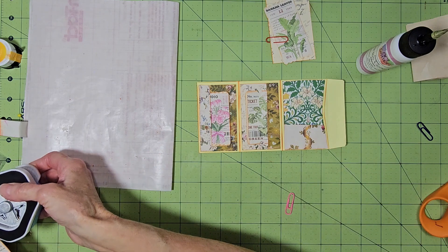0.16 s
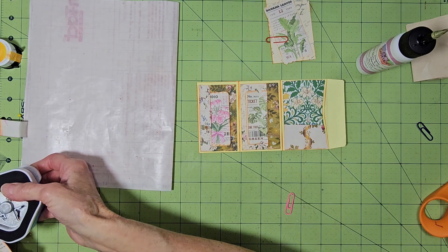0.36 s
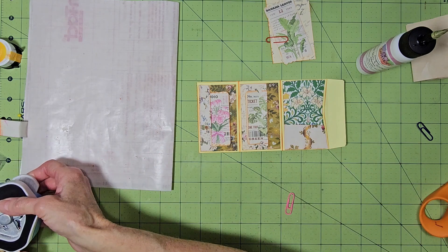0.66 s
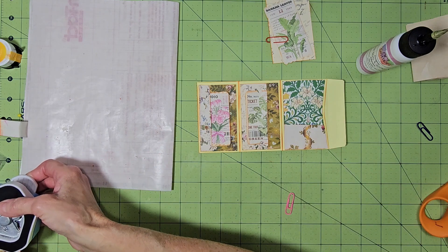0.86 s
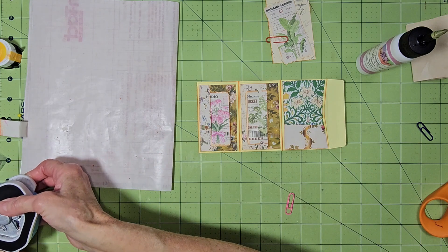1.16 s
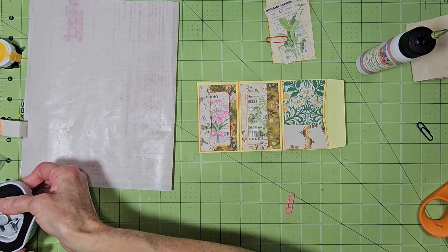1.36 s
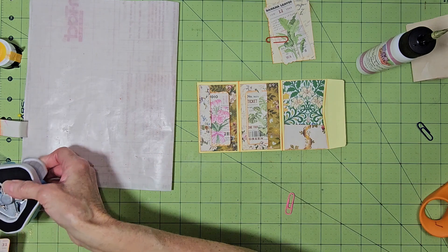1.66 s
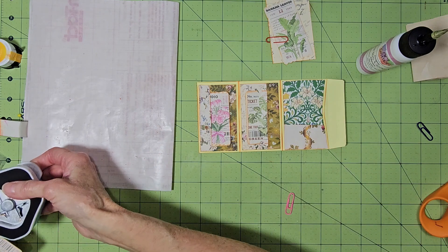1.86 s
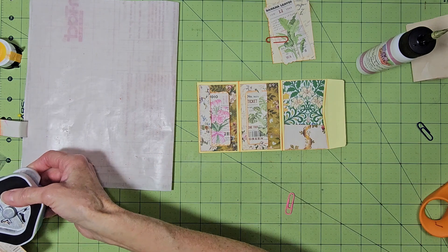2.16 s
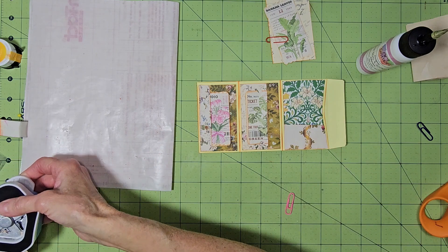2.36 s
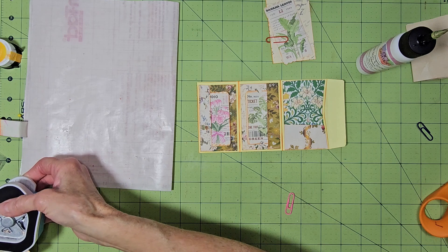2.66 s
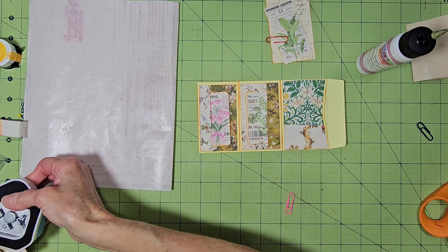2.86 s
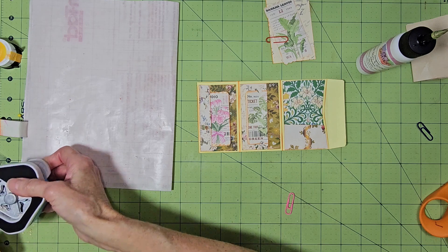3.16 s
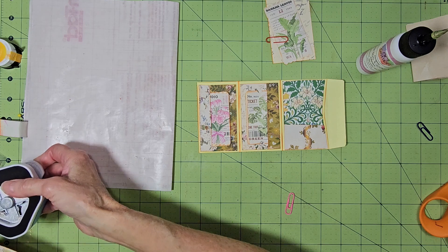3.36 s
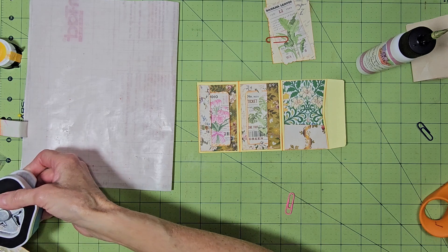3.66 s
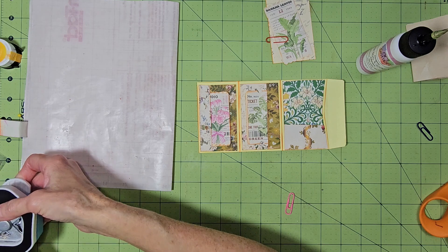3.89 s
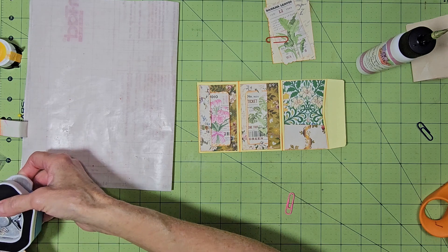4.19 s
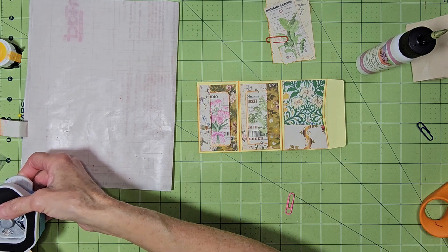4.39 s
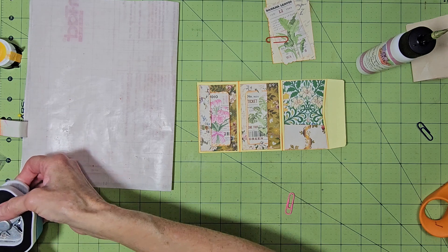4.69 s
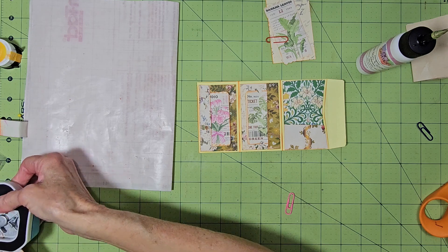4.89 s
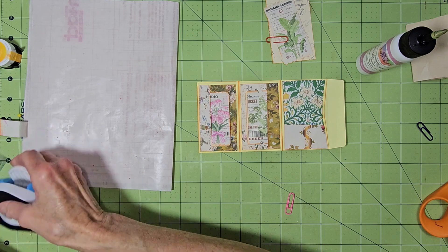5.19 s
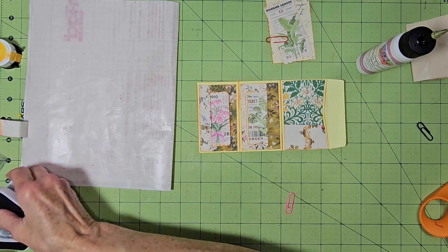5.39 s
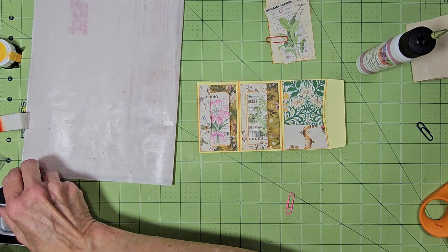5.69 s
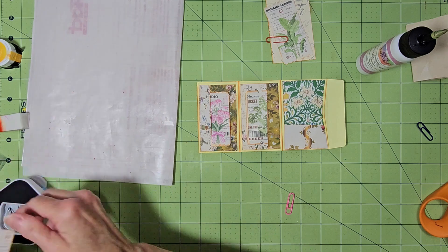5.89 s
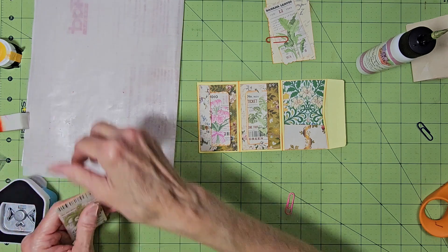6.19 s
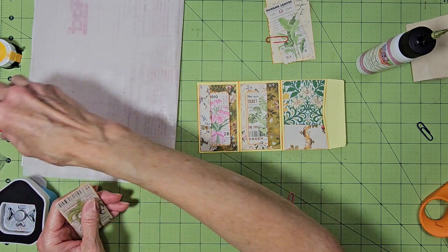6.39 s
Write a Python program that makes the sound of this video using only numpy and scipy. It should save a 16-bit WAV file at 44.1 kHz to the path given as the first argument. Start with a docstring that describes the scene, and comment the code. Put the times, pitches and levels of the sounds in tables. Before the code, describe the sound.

Card scrapes into a hand-held corner punch that bites with three sharp crunching snaps, then is set down with dull table knocks over faint fan hum.

```python
"""Card slides into a hand-held corner punch in uneven noise; its edge taps and the lever ticks, as bursts.
At about 1.3, 2.8 and 4.8 s the punch bites: torn fibres crackle louder and louder, then a burst snaps
and fading tones ring the housing. From 5.2 s three knocks set it down, a push shaking the table's tones;
taps and slides come between and after them. Throughout, a small room echoes it in stereo and a fan hums
in soft air. A low drone of filtered noise swells and dies early; a deeper rumble grows from 3.6 s, then eases."""
import sys
import numpy as np
from scipy import signal
from scipy.fft import rfft, irfft, next_fast_len
from scipy.io import wavfile
from scipy.ndimage import uniform_filter1d

SR = 44100
rng = np.random.default_rng(int(sys.argv[2]) if len(sys.argv) > 2 else 0)


def materialize(psi):
    """Save the field psi as 16-bit PCM at rate SR to the path in sys.argv[1].

    A 1-D psi becomes a single channel; in a 2-D psi each row is a channel.
    """
    bounded = np.clip(np.atleast_2d(psi).T, -1, 1)
    quanta = np.round(bounded * 32767).astype(np.int16)
    wavfile.write(sys.argv[1], SR, quanta)


N = 288414  # length of the scene in samples
T = np.arange(SR // 2) / SR  # clock for one short sound, half a second
FIRM_DB = -57  # level of a firm touch, from which brightness is counted

# The blade breaking through the card; levels after the first are relative to it:
# (time [s], level [dB], tearing [dB], tearing time [s], long ring [dB], die [dB], shell [dB],
#  shell pitch [Hz], bass [dB], treble [dB])
BLADE_SNAPS = [(1.3445, -27, -10, 0.0045, -21, -8, -7, 1646, 1.5, 0.5),
               (2.7775, -31.5, -3.5, .004, -35, -24, -13, 1380, -10.5, -8),
               (4.8011, -25, -12, 0.003, -23.5, -4, -3, 1810, 0, 1)]
# Colour of the tear and crack: (frequency [Hz], level [dB])
CRACK_COLOUR = [(150, -31), (400, -13.5), (520, -4), (750, -9), (1050, -9.5), (1350, -6), (1720, 5),
                (2250, -6.5), (2950, 2.5), (3600, -5), (4500, 5.5), (6000, -8), (8000, -11), (11000, -14),
                (15500, -12.5)]
# The die's short hard ring: (frequency [Hz], level [dB], time to fade by 60 dB [s])
DIE_RING = [(4400, -3, .008), (4850, 2, 0.012), (5100, -3, 0.0068), (8160, -12.5, 0.0088)]
# Housing and spring, ringing on: (frequency [Hz], level [dB], time to fade by 60 dB [s])
HOUSING_RING = [(1300, -17, .13), (1450, -4.5, .13), (1755, -3, 0.2), (1650, -3, 0.42), (1874, -2, 0.079),
                (2010, -13, 0.13), (2280, -15, .16), (2980, -10, 0.28), (4380, -5, 0.25),
                (4200, -0.5, 0.22), (5000, 0, 0.12), (4850, -3, 0.083), (5000, 2, 0.16), (6400, -7.5, 0.13)]


def snaps():
    """Fibres tear louder and louder, then the blade shoots through the die and rings the housing."""
    out = np.zeros(N)
    swell = 1 - np.exp(-T / 0.00023)  # the rings take a moment to build up
    for s, db, tear_db, tear_s, ring_db, die_db, shell_db, shell_hz, bass_db, treble_db in BLADE_SNAPS:
        n = int(4 * tear_s * SR)
        growth = np.exp((T[:n] - T[n]) / tear_s)
        tear = np.pad(fibres(n, spread_db=-7.0) * growth, (0, n))  # silence lets the filter ring out
        tear = blow(colour(tear, CRACK_COLOUR, bass_db, treble_db), db + tear_db)
        add(out, s - T[n], tear)  # the tearing leads up to the snap
        crack = blow(colour(contact(decay_s=0.0017), CRACK_COLOUR, bass_db, treble_db), db)
        die = blow(band(ring(DIE_RING), 3700, 9000), db + die_db)
        # the hand damps the plastic shell, and its grip sets the pitch of that short ring
        shell = band(ring([(shell_hz, 0, 0.03)]) * swell, 1300, 2000)
        shell = blow(shell, db + shell_db)
        housing = blow(ring(HOUSING_RING) * swell, db + ring_db)
        add(out, s, crack + die + shell + housing)
    return out


# The punch being set down: (time [s], thud [dB], body clatter [dB], clatter treble [dB],
#  hard foot click [dB], ringing of loose things [dB])
SET_DOWNS = [(5.1927, -27, -38.5, -10, -38, -56.5), (5.324, -28.5, -41.5, -10, -39, -76),
             (5.7415, -24, -32.5, -4, -45.5, -50.5)]
# Tones of the table top: (frequency [Hz], level [dB], time to fade by 60 dB [s])
TABLE_TONES = [(80.8, 3, 0.2), (141.6, -4, 0.22), (159, -2.5, 0.11), (182.4, -3, 0.079),
               (235.7, 5.5, 0.088), (266, -1.5, 0.065), (317, 0, 0.054), (376.2, -2, 0.135),
               (620, -6, 0.19), (545, -14, 0.14), (730, -20, .13), (1230, -24, .12)]
# Tones of the punch's hard foot: (frequency [Hz], level [dB], time to fade by 60 dB [s])
FOOT_TONES = [(3350, -7, 0.0043), (3670, 3, 0.0024)]
# Something loose on the table ringing along: (frequency [Hz], level [dB], time to fade by 60 dB [s])
LOOSE_TONES = [(452, -4.5, 0.54), (480, -12, 0.9), (528, -7, 0.43)]
# Colour of the body's clatter: (frequency [Hz], level [dB])
CLATTER_COLOUR = [(100, -4.5), (350, 1), (650, -0.5), (1000, -2.5), (1500, -12.5), (2000, -5.5),
                  (3000, -17), (6000, -16.5), (10000, -26.5), (15500, -28)]


def knocks():
    """A hard foot clicks, the body clatters, and the weight pushes the table into its low tones."""
    out = np.zeros(N)
    push = np.exp(-((T - 0.0028) / 0.00086) ** 2)  # a soft push a few milliseconds long
    shaken_table = signal.fftconvolve(ring(TABLE_TONES), push)[:len(T)]
    thud = band(shaken_table, 105, 3000)  # keep only the thud's audible low tones
    foot = band(ring(FOOT_TONES), 2160, 7700)  # keep the click within its middle band
    slow_start = 1 - np.exp(-T / 0.031)  # the loose thing takes up the shaking slowly
    loose = ring(LOOSE_TONES) * slow_start * (1 - T / T[-1])
    for s, thud_db, clatter_db, treble_db, foot_db, loose_db in SET_DOWNS:
        clatter = blow(colour(contact(decay_s=0.0022), CLATTER_COLOUR, 0, treble_db), clatter_db)
        add(out, s, blow(thud, thud_db) + clatter + blow(foot, foot_db) + blow(loose, loose_db))
    return out


# The lever catching under the thumb: (time [s], level [dB], decay time [s], resonance [Hz])
LEVER_CATCHES = [(.302, -59, 0.0044, 1920), (1.1645, -61, 0.0018, 2950), (1.189, -61.5, .004, 5400),
                 (1.206, -57, 0.0016, 3100), (1.2413, -54, .007, 1800), (1.9221, -64.5, 0.0022, 1880),
                 (2.6649, -58, .0013, 3250), (2.7168, -61.5, 0.0022, 1670), (4.6157, -63.5, .003, 1800),
                 (4.7571, -53.5, 0.013, 1770), (4.777, -51, .0056, 1790), (4.9644, -57.5, .005, 1750),
                 (5.0177, -58, .007, 1700)]
# Colour of a tick, for the lever and the card's edge: (frequency [Hz], level [dB])
TICK_COLOUR = [(200, -20.5), (600, -15), (1200, -3), (1950, 2), (2450, -7.5), (3100, -4.5), (4000, -5),
               (6000, -9.5), (10000, -23), (15500, -22.5)]


def lever_catches():
    """The lever catches with a brief chatter and one resonance; harder catches are brighter."""
    out = np.zeros(N)
    for s, db, decay_s, hz in LEVER_CATCHES:
        treble_db = -9.5 + 2.16 * (db - FIRM_DB)
        catch = colour(contact(decay_s), TICK_COLOUR, -10, treble_db)  # the lever has little bass
        add(out, s, blow(resonate(catch, hz, db=7), db))
    return out


# The card's edge tapping the punch: (time [s], level [dB], decay time [s], brightness [dB])
EDGE_TAPS = [(0.3076, -51, .0016, 1), (.645, -56, .007, -6.5), (0.66, -59.5, .007, -5.5),
             (1.653, -59, 0.011, 7), (1.7883, -54.5, 0.00085, 11.5), (2.298, -67, .003, 1),
             (2.3404, -67.5, 0.004, -7), (2.8245, -46.5, 0.0018, 10.5), (2.985, -61.5, 0.0027, -9),
             (3.0224, -59, 0.0043, -4), (3.087, -61.5, 0.0035, -10), (3.239, -64, .0027, 14),
             (3.497, -61, 0.0062, 19.5), (4.0745, -70.5, .0045, -2.5), (4.2143, -71, .01, 10),
             (4.919, -55, 0.0084, 20), (5.467, -56, 0.0012, 17), (5.994, -62, .003, 8),
             (6.1222, -50.5, 0.0034, 16.5)]


def edge_taps():
    """The card's edge taps the punch; a stiffer, brighter edge is thinner and rings higher."""
    out = np.zeros(N)
    for s, db, decay_s, bright_db in EDGE_TAPS:
        bass_db = 5.5 - 0.36 * bright_db
        edge_hz = 2170 * 2 ** (bright_db / 18)  # an octave higher for every 18 dB
        tap = colour(contact(decay_s), TICK_COLOUR, bass_db, bright_db)
        add(out, s, blow(resonate(tap, edge_hz, db=1.5), db))
    return out


# Card fed into the slot, gathering speed until it stops:
# (time of the stop [s], rise time [s], scrape level [dB], resonance [Hz])
SLOT_FEEDS = [(.429, 0.025, -67, 1990), (.555, 0.058, -55.5, 2290), (1.555, 0.056, -62, 1925),
              (2.05, 0.056, -67.5, 2900), (2.285, 0.054, -66, 2360), (2.41, 0.023, -68.5, 2100),
              (3.056, 0.07, -57, 2365), (4.675, 0.023, -71.5, 1810), (4.96, 0.21, -67, 2790)]
# Colour of the scrape in the slot: (frequency [Hz], level [dB])
SLOT_COLOUR = [(300, -8), (700, -17.5), (1300, -0.5), (2000, 5.5), (2500, -5), (3100, -2), (4500, -22.5),
               (8000, -31), (15500, -37.5)]


def card_feeds():
    """Card gathers speed into the slot and stops: its edge scrapes and its face hisses."""
    out, t = np.zeros(N), movement_clock()
    for s, rise_s, db, hz in SLOT_FEEDS:
        scrape = colour(fibres(len(t), spread_db=6.0), SLOT_COLOUR)
        scrape = level(resonate(scrape, hz, db=2), db)
        hiss_db = -65 + 1.5 * (db - FIRM_DB)  # the hiss grows faster than the scrape
        face = hiss(len(t), hiss_db, treble_db=-5, hz=5260)  # resonance of the sheet held in the slot
        add(out, s + t[0], stroke(t, rise_s, hold_s=0, fall_s=0.014) * (scrape + face))
    return out


# Card sliding over card, mat and fingers:
# (start [s], length [s], level [dB], treble [dB], resonance [Hz])
CARD_SLIDES = [(.55, 0.065, -71.5, 1, 6300), (1.318, 0.074, -62, -6, 4800), (1.531, .12, -69.5, 0.5, 8900),
               (1.657, 0.095, -70, 7, 9150), (2.276, .02, -76.5, 1, 9830), (3.04, 0.025, -59.5, -.5, 4500),
               (3.285, 0.095, -66, 8.5, 6530), (3.419, 0.087, -71, 10, 7200),
               (3.582, 0.076, -78.5, -4, 6600), (4.132, 0.093, -80.5, -6, 6500), (4.878, .14, -70, 1, 2920),
               (5.436, 0.026, -57.5, -5, 6640), (5.572, 0.19, -70.5, -7, 6640), (6.02, .025, -66, 4, 5830),
               (6.132, .017, -55.5, -1, 4500), (6.314, 0.037, -75, 4, 5000)]


def card_slides():
    """Card rubs over card, mat and fingers, with a soft start and end to each hiss."""
    out, t = np.zeros(N), movement_clock()
    for s, length_s, db, treble_db, hz in CARD_SLIDES:
        movement = stroke(t, rise_s=0.028, hold_s=length_s, fall_s=0.019)
        add(out, s + t[0], movement * hiss(len(t), db, treble_db, hz))
    return out


# Colour of the card's face when rubbed: (frequency [Hz], level [dB])
SHEET_COLOUR = [(400, -11.5), (1500, -18), (3000, 0.5), (4400, 4.5), (7000, -1), (9500, -7.5), (11500, -4),
                (13500, -7.5), (15500, -11.5)]


def hiss(n, db, treble_db, hz):
    """The face of the card rubs, and stray fibres snag."""
    snagging = rng.random(n) < 90 / SR  # about 90 snags a second
    snags = level(rng.standard_normal(n) * snagging, -5.5)
    rubbing = colour(fibres(n, spread_db=3.5) + snags, SHEET_COLOUR, 0, treble_db)
    return level(resonate(rubbing, hz, db=-3.5), db)


# The punch dragging on the mat: (time [s], level [dB], middle of the band [Hz])
MAT_DRAGS = [(2.239, -56, 880), (2.275, -68, 698)]


def mat_drags():
    """The punch drags briefly on the mat: rough noise in a narrow band swells and fades."""
    out = np.zeros(N)
    for s, db, hz in MAT_DRAGS:
        rubbing = fibres(len(T), spread_db=5.5) * T * np.exp(-T / 0.0053)
        add(out, s, blow(band(rubbing, hz * 0.69, hz * 1.32), db))
    return out


# Early reflections from nearby surfaces and, at about 14 ms, the ceiling;
# one list for each side, left first: (delay [s], gain [ratio])
EARLY_ECHOES = [
    [(.0009, 0.29), (.0026, .4), (.0042, .3), (.0135, 0.41)],
    [(.0013, 0.81), (.0021, .4), (.0038, 0.39), (.0140, .27)],
]
# The room: (frequency [Hz], time to fade by 60 dB [s], tail level [dB], likeness of the sides [0-1])
ROOM_TAIL = [(99.9, 0.078, -15.5, 0.8), (300, 0.25, -8, 0.5), (800, 0.14, -3.5, 0.2),
             (2000, 0.22, -4.5, .05), (3300, .17, -6.5, 0), (4870, .18, -5.5, .05), (8700, .16, -1.5, 0.2),
             (15000, 0.32, -12, 0.2)]
# Shadow on the microphone's right port: (frequency [Hz], level [dB])
RIGHT_SHADOW = [(200, -0.5), (700, 1.5), (1500, -2), (3000, -7), (4500, -13), (6500, -3.5), (9000, 0.5),
                (13000, -7)]


def room(x):
    """The sound reaches the left port first; nearby surfaces and ceiling echo it, then a short tail."""
    hz = np.fft.rfftfreq(len(T), 1 / SR)
    noise, out = rfft(rng.standard_normal((3, len(T)))), []  # left, right and shared noise
    short_waves = hz ** 2 / (hz ** 2 + 700 ** 2)  # long waves bend round small obstacles
    shadow_db = along(hz, RIGHT_SHADOW, [p[1] for p in RIGHT_SHADOW])
    lead = len(T) // 100  # space ahead of the direct sound, cut off again below
    for side in range(2):
        tail = 0
        for k, (_, t60, db, like) in enumerate(ROOM_TAIL):
            like = np.clip(like, 0, 1)
            share = along(hz, ROOM_TAIL, np.eye(len(ROOM_TAIL))[k])  # this row's band
            fade = np.exp(-np.log(1000) * T / t60) * np.clip((T - 0.002) / 0.0054, 0, 1)
            mixed = np.sqrt(like) * noise[2] + np.sqrt(1 - like) * noise[side]
            tail = tail + irfft(share * mixed, len(T)) * fade * undb(db) / np.linalg.norm(fade)
        echoes = sum(gain * np.exp(-2j * np.pi * hz * delay) for delay, gain in EARLY_ECHOES[side])
        right_lag = np.exp(-2j * np.pi * hz * side * 0.00032)  # 0.32 ms later on the right
        direct = (1 + short_waves * echoes) * undb(side * shadow_db) * right_lag
        response = np.roll(irfft(direct, len(T)) + tail, lead)
        out.append(signal.fftconvolve(x, response)[lead:lead + N])
    return np.array(out)


# Colour of the room air: (frequency [Hz], level [dB])
AIR_COLOUR = [(30, -14), (55, -2), (100, 1), (135, -6), (170, -12.5), (270, -16), (335, -30.5),
              (490, -26.5), (700, -37), (1100, -39), (1750, -36), (2500, -42.5), (3200, -42.5),
              (6000, -52.5), (10000, -64.5), (12000, -54), (16000, -62)]
# Fan hum: (frequency [Hz], rms level [dB], wander [Hz])
FAN_HUM = [(93.4, -67.5, 4), (127.3, -69, 0.93), (182.5, -72.5, 1.5), (239.5, -63, 0.78),
           (282.4, -81.5, 2.2), (353, -89, 0.64)]
# Low rumble over time: (time [s], level [dB])
RUMBLE_LEVEL = [(0, -65), (3.6, -63), (3.72, -53), (4.65, -55), (4.95, -62), (6.5, -62)]
# Low drone that dies away: (time [s], level [dB])
DRONE_LEVEL = [(0, -62), (.45, -55), (.95, -57), (1.6, -72)]


def background():
    """Wavering fan hum and room air, with a low drone and rumble under them."""
    t = np.arange(N) / SR
    # mid is the same on both sides, side is what differs
    mid, side = (level(colour(rng.standard_normal(N), AIR_COLOUR), -56) for _ in range(2))
    side = colour(side, [(60, -28.5), (200, -2.5), (500, -2.5), (1500, -0.5), (8000, 0.5)])
    for hz, db, wander_hz in FAN_HUM:
        drift = np.interp(t, np.arange(80) / 12, rng.standard_normal(80))  # a new aim 12 times a second
        phase = 2 * np.pi * np.cumsum(hz + wander_hz * drift) / SR
        mid = mid + level(np.sin(phase), db)
    rumble_gain = undb(np.interp(t, *np.transpose(RUMBLE_LEVEL)))
    rumble = level(band(rng.standard_normal((2, N)), 26, 50), 0) * rumble_gain
    side = side + undb(-8.5) * rumble[1]  # part of the rumble differs between the sides
    drone_gain = undb(np.interp(t, *np.transpose(DRONE_LEVEL)))
    drone = level(band(rng.standard_normal(N), 88, 116), 0) * drone_gain
    return mid + drone + rumble[0] + np.array([side, -side])


def contact(decay_s):
    """A brief chatter of surfaces that holds all pitches about equally."""
    spectrum = rfft(rng.standard_normal(len(T)) * np.exp(-T / decay_s))
    smooth = np.sqrt(uniform_filter1d(np.abs(spectrum) ** 2, size=300))
    return irfft(spectrum / smooth, len(T)) * (T < T[-1] / 2)


def fibres(n, spread_db):
    """Dense micro-clicks of uneven size."""
    size = np.minimum(rng.exponential(size=n // 16 + 1), 5)
    size = np.repeat(size, 16)[:n]  # each size lasts 16 samples
    return level(rng.standard_normal(n) * undb(spread_db * size), 0)


def ring(modes):
    """Struck tones dying away, each at its own pace."""
    return sum(undb(db - 60 * T / t60) * np.sin(2 * np.pi * hz * T) for hz, db, t60 in modes)


def resonate(x, hz, db):
    """Lift a narrow band by a resonance."""
    return x + undb(db) * signal.lfilter(*signal.iirpeak(hz, 8, fs=SR), x)


def movement_clock():
    """One second of time for a movement, starting 0.4 s before its zero."""
    return np.arange(2 * len(T)) / SR - 0.4


def stroke(t, rise_s, hold_s, fall_s):
    """Attack, hold and release of a movement, roughened by uneven grip."""
    outside = np.maximum(-t / rise_s, (t - hold_s) / fall_s)
    speed = np.exp(-np.maximum(outside, 0) ** 1.8)
    grip = level(band(rng.standard_normal(len(t)), 25, 140), 0)
    return speed * level(undb(grip * 1.3), 0)


def colour(x, points, bass_db=0, treble_db=0):
    """Filter to a given spectrum without sounding early; shelves below 1.1 kHz and above 5 kHz."""
    n = 2 * next_fast_len(len(x))
    hz = np.fft.rfftfreq(n, 1 / SR)
    bass = bass_db / (1 + (hz / 1100) ** 4)
    treble = treble_db * (1 - 1 / (1 + (hz / 5000) ** 4))
    db = along(hz, points, [p[1] for p in points]) + bass + treble
    cepstrum = irfft(np.log(undb(db)))
    cepstrum[1:n // 2] *= 2  # folding it forward in time makes the filter causal
    cepstrum[n // 2 + 1:] = 0
    return irfft(rfft(x, n) * np.exp(rfft(cepstrum)))[:len(x)]


def along(hz, points, column):
    """Read a table on a log-frequency axis."""
    return np.interp(np.log(hz + 1), np.log([p[0] for p in points]), column)


def band(x, lo_hz, hi_hz):
    """Keep mainly the pitches between two limits."""
    limits = [lo_hz, min(hi_hz, SR / 2 - 1)]
    return signal.sosfilt(signal.butter(2, limits, "band", fs=SR, output="sos"), x)


def undb(db):
    """Decibels to gain."""
    return 10 ** (np.asarray(db) / 20)


def level(x, db):
    """Set the rms level."""
    return x * undb(db) / np.sqrt(np.mean(x ** 2))


def blow(x, db):
    """Set the level of a short sound, as if all its energy fell in 10 ms."""
    return x * undb(db) / np.sqrt(np.sum(x ** 2) / (SR / 100))


def add(out, s, x):
    """Mix a sound in at a time in seconds."""
    i = max(int(s * SR), 0)
    out[i:i + len(x)] += x[:max(N - i, 0)]


def scene():
    """All that happens on the table shares one room."""
    punch = snaps() + knocks() + lever_catches() + mat_drags()
    card = edge_taps() + card_feeds() + card_slides()
    return room(punch + card) + background()


def record(dry):
    """The recorder cuts the top, above 16.1 kHz."""
    return signal.sosfilt(signal.ellip(10, 0.1, 70, 16100, fs=SR, output="sos"), dry)


dry = scene()
out = record(dry)
materialize(out)
```